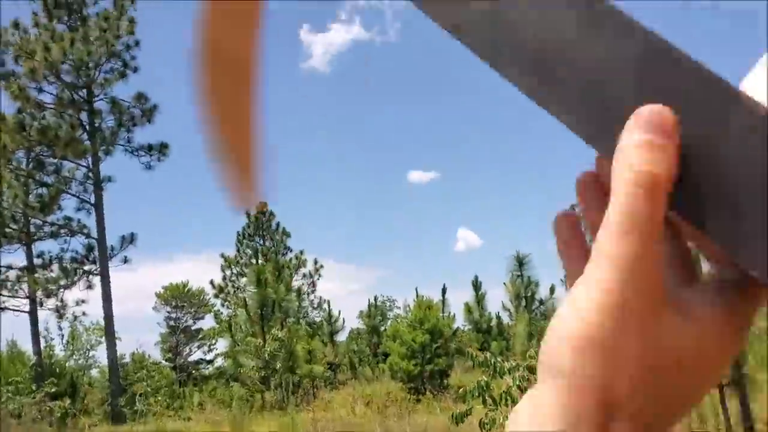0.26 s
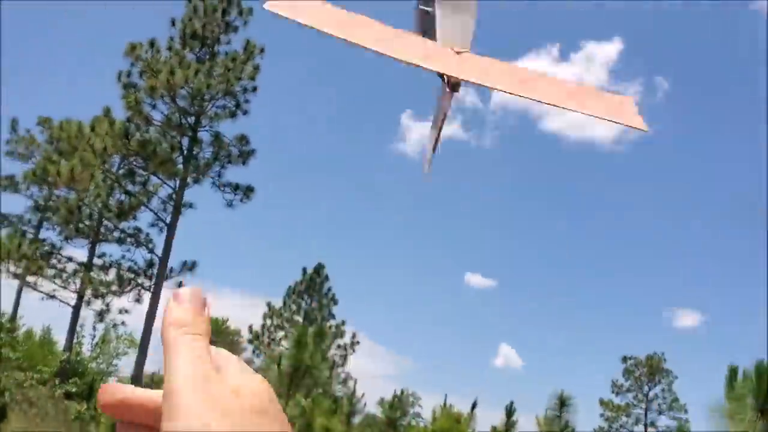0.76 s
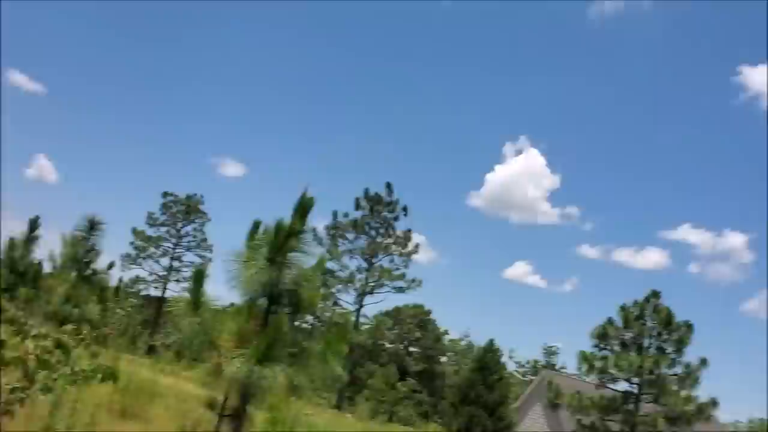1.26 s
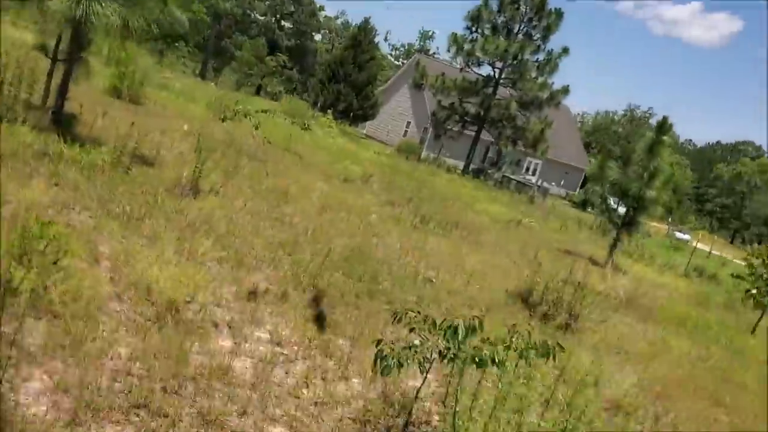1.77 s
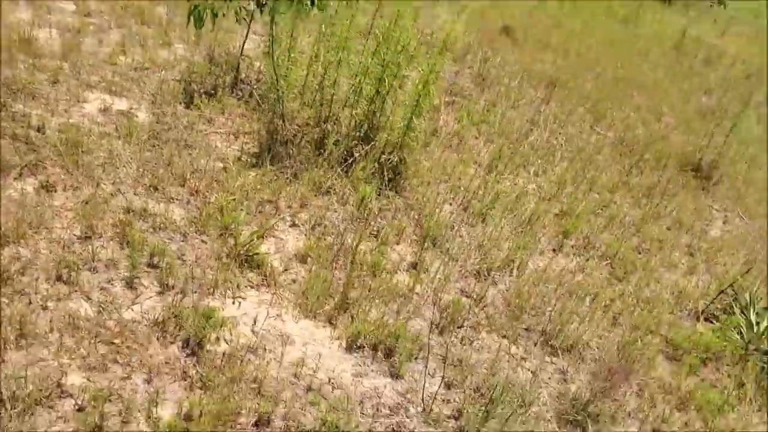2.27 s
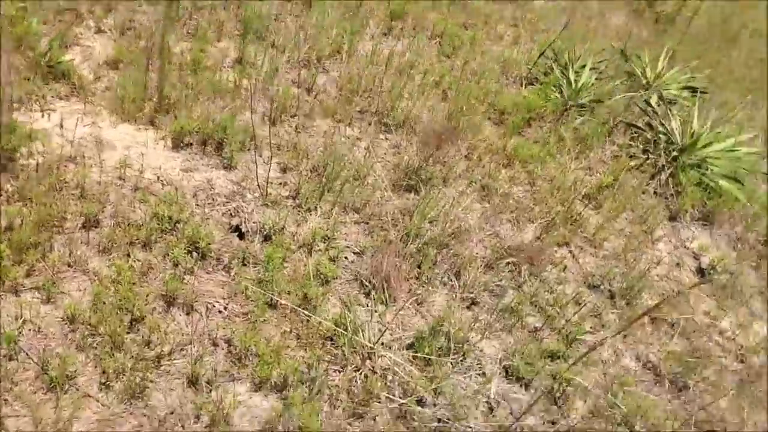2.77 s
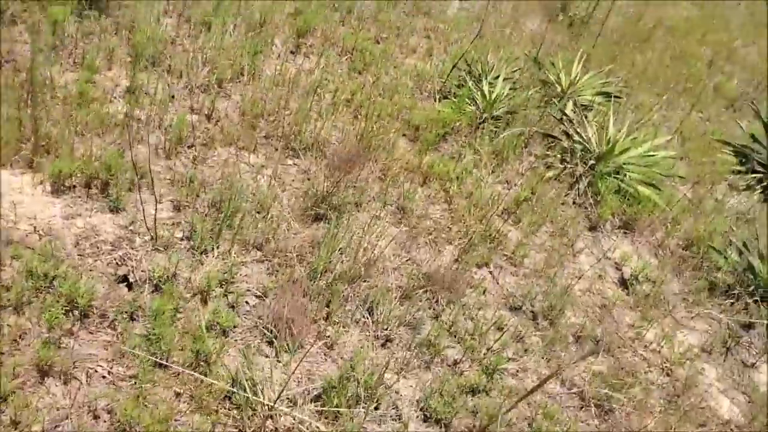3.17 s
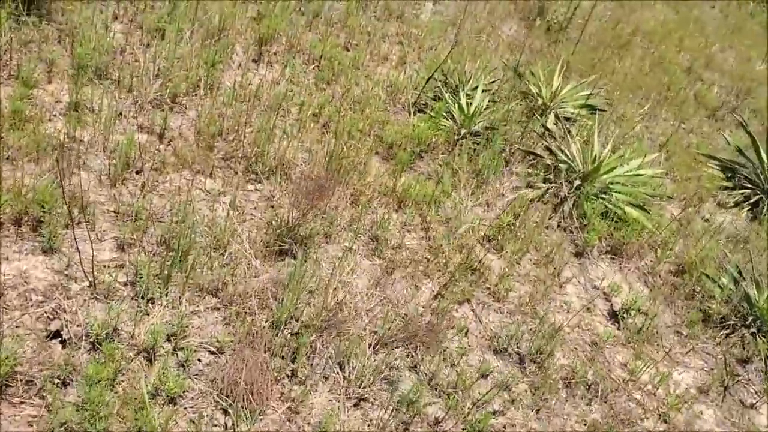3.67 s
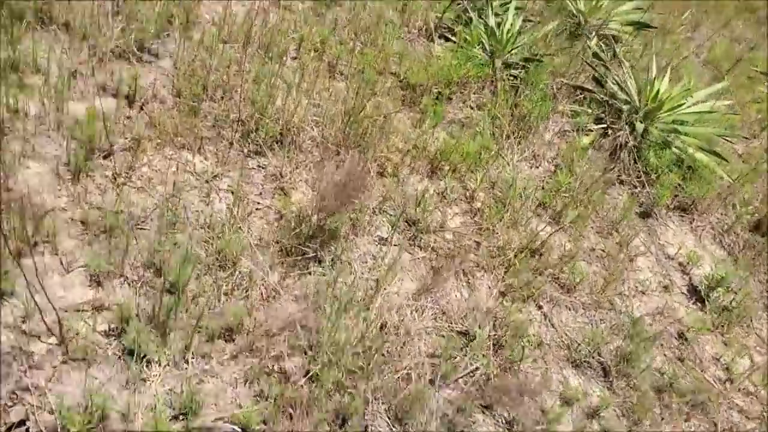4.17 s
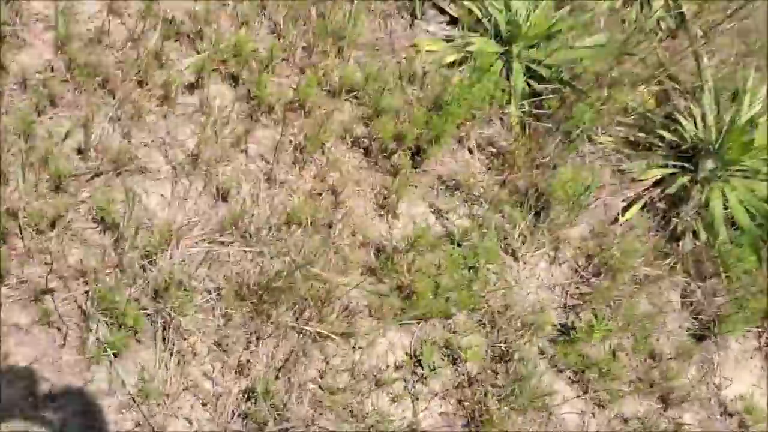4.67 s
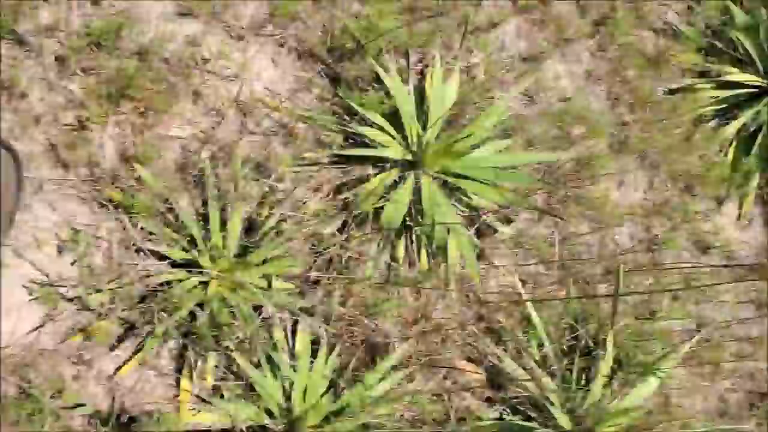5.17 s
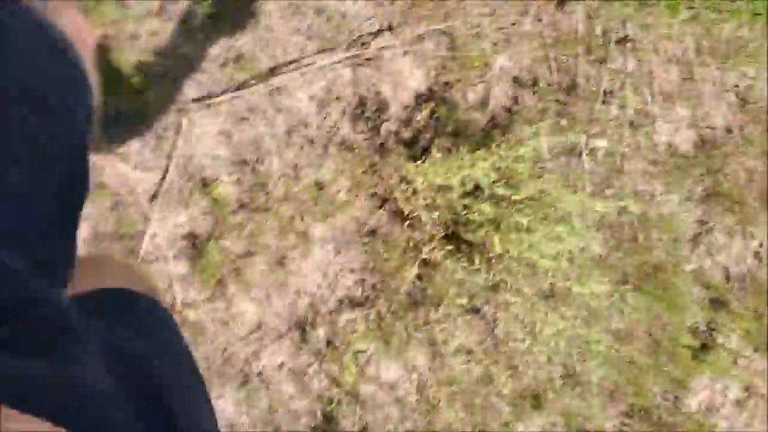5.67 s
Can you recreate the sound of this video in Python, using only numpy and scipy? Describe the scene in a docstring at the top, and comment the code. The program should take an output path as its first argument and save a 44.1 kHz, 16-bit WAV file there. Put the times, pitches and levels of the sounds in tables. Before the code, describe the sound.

Outdoors, quick clicks and an airy whoosh of a launched model plane give way to dry snaps and crunching steps through brittle plants.

```python
"""Steps through dry meadow plants lead: straw crunches as dense random breaks exciting resonant stalks,
blades swish along the legs as finer, higher breaks, and stalks and twigs snap as short bursts with a ring.
Before the walk, someone with a small camera throws a rubber-driven model plane: the hand snaps and clicks on
it, filtered grains rush and fade, and decaying resonances knock once a turn. Low noise buffets two microphone
ports, decaying low notes thud on the ground, and a faint steady outdoor hiss lies beneath."""
import sys
import numpy as np
from scipy import signal
from scipy.fft import rfft, irfft
from scipy.io import wavfile
from scipy.ndimage import uniform_filter1d

SR = 44100
rng = np.random.default_rng(int(sys.argv[2]) if len(sys.argv) > 2 else 0)


def master_out(mix):
    """Clip the mix to full scale and print it as 16-bit PCM to the path in sys.argv[1]."""
    frames = np.transpose(np.atleast_2d(mix))
    ceiling = np.clip(frames, -1, 1)
    pcm = np.round(ceiling * 32767).astype(np.int16)
    wavfile.write(sys.argv[1], SR, pcm)


N = 260542  # samples

# Outdoor hiss, spectral shape: (frequency [Hz], gain [dB])
AIR_SPECTRUM = [(59, -49), (100, 2), (186, -4), (291, -18.5), (486, 4), (778, -3.5), (1610, -3), (3050, -9),
                (6450, -12.5), (7650, -20), (13900, -11.5), (15500, -21), (16500, -40)]
# Turbulence at the ports, spectral shape: (frequency [Hz], gain [dB])
BUFFET_SPECTRUM = [(12, -3.5), (20, -21), (47, 5), (87, 5), (103, 2.5), (135, -14.5), (250, -12.5),
                   (320, -28.5), (550, -120)]
# Puffs of air at the ports as the camera swings: (peak time [s], length [s], level [dB])
AIR_PUFFS = [(0.252, 0.47, -32), (0.54, 0.65, -43.5), (1.326, 0.029, -21), (1.466, 0.28, -41.5),
             (1.789, 0.053, -43), (2.1, .3, -53.5), (2.646, 0.28, -57.5), (3.093, 0.12, -58),
             (3.75, 0.35, -53), (4.546, 0.99, -49), (5.019, .25, -33.5), (5.362, 0.14, -40.5),
             (5.487, 0.092, -40.5), (5.81, 0.43, -30.5)]
# Air rushing over the wing, spectral shape: (frequency [Hz], gain [dB])
RUSH_SPECTRUM = [(71, -15), (120, -5.5), (286, -6), (718, -3.5), (771, -3), (1260, -7.5), (2200, -2.5),
                 (4700, -22.5), (9000, -17), (11700, -86), (19800, -120)]
# Resonances of the model's fuselage: (frequency [Hz], level [dB], 60 dB decay time [s])
FUSELAGE_MODES = [(1184, -2.5, 0.019), (1600, -4, 0.021), (2390, -1.5, 0.011)]
# Dull thuds on the ground: (time [s], level [dB])
GROUND_THUDS = [(1.3138, -7), (1.665, -42), (2.125, -43.5), (4.087, -33), (4.525, -29), (4.89, -29),
                (5.321, -37), (5.481, -29), (5.842, -28)]
# Sharp snaps and clicks, the first three of the hand on the model:
# (time [s], level [dB], ring pitch [Hz], treble re body [dB], left minus right [dB])
SHARP_SNAPS = [(.085, -15.5, 3530, -16, 17), (.091, -15, 3200, -6, 5), (.154, -8.5, 700, -1, -2.5),
               (1.312, -9.5, 840, -20, -7.5), (1.3145, -13, 597, -30, 0), (1.332, -10, 1030, -16, 3.5),
               (1.382, -9, 500, -0.5, 7), (1.39, -17.5, 600, -25, -8), (1.408, -9, 1760, -16, 2),
               (1.453, -10.5, 3440, -14, 6), (1.511, -36, 1670, -28, -3.5), (1.665, -32.5, 756, -21, 6),
               (1.686, -41.5, 1640, -27, -7.5), (1.765, -21, 3340, -18, 7.5),
               (1.991, -9.5, 840, -7.5, -1.5), (2.108, -40, 900, -22, 2.5), (2.127, -35.5, 584, -22, 0),
               (2.389, -14.5, 830, -39, 9.5), (2.414, -30, 756, -37, -9.5), (2.488, -35.5, 1200, -17, -3),
               (2.652, -25, 655, -22, 3), (2.658, -25.5, 930, -24, -12.5), (2.717, -22.5, 1100, -21, 1.5),
               (2.792, -38.5, 553, 11, 2), (2.869, -45, 501, 13, -1), (2.917, -54, 536, 16, -1),
               (3.15, -47, 2090, 6, -1), (3.159, -42, 2130, 14, -7.5), (3.181, -36, 1990, .6, 1.5),
               (3.447, -42, 1570, -4, -5.5), (3.545, -28, 5950, 6, 3), (3.58, -36.5, 2160, 14, 2.5),
               (3.683, -30, 3330, 10, 3.5), (3.709, -25, 5250, -2, 2.5), (3.897, -27, 2360, -5, -0.5),
               (4.023, -33, 2470, -17, -2.5), (4.087, -40, 732, 18, -1.2), (4.123, -24, 1810, -6, -4.5),
               (4.236, -33.5, 610, 7, 1.8), (4.322, -34, 2220, -24, -8), (4.369, -24, 1710, -19, 3.5),
               (4.526, -28.5, 614, 1, 1.5), (4.713, -41.5, 2390, 18.5, 3.5), (4.747, -39, 585, 20, 4.5),
               (4.781, -32, 680, 5, 1), (4.799, -17, 570, 7, 5), (4.972, -17.5, 690, -2.5, 3.5),
               (4.996, -11.5, 1060, -21, 2.5), (5.005, -11, 825, -7.5, 10.5), (5.03, -11, 730, -7, 6),
               (5.069, -19.5, 1630, -14, 6), (5.108, -21, 2080, 4, 3.5), (5.299, -13.5, 2520, -16, 7.5),
               (5.32, -23.5, 2380, 5.5, 4), (5.481, -10, 800, -12, 7.5), (5.629, -13.5, 786, -4, 5),
               (5.704, -36.5, 571, 14, -6), (5.842, -6, 815, -5.5, 1.5), (5.853, -13, 940, -26, 0.6)]
# Single breaks, spectral shape: (frequency [Hz], gain [dB])
CRACK_SPECTRUM = [(150, -14.5), (400, -5), (900, -3.5), (2200, -1.5), (4500, -0.5), (6500, -5), (8500, -25)]
# Crunching straw, spectral shape: (frequency [Hz], gain [dB])
CRUNCH_SPECTRUM = [(71, -37), (120, -9), (291, -15), (445, -8), (510, -9), (1460, -7.5), (2280, -6.5),
                   (4420, -11.5), (7000, -73), (9100, -1), (15400, -120)]
# Blades along the legs, spectral shape: (frequency [Hz], gain [dB])
SWISH_SPECTRUM = [(3000, -6.5), (4200, -16.5), (5300, -5.5), (6600, -0.5), (7600, -11.5), (9500, -13),
                  (12200, 1), (14500, -4), (16000, -4)]
# Resonances of stalks of several sizes: frequency [Hz]
STALK_RINGS_HZ = [180, 300, 500, 800, 1300, 2100, 3400, 5500]
# Short scrapes through straw, the first three of the hand on the model:
# (peak time [s], length [s], crunch level [dB], swish level [dB], crunch brightness [dB])
STRAW_SCRAPES = [(0.076, 0.1, -50, -43, 15.5), (.158, 0.015, -23, -32, -2), (0.43, 0.045, -60, -47.5, 0),
                 (1.396, 0.033, -21.5, -38, -3), (1.779, .06, -55.5, -60, -4),
                 (2.353, 0.049, -50.5, -64, -4), (2.404, 0.045, -49, -69, -4),
                 (2.607, 0.052, -39.5, -38.5, -13), (2.663, 0.044, -40, -50, 3),
                 (2.715, 0.022, -38.5, -43.5, 8), (2.795, 0.025, -64, -44, -4),
                 (2.864, 0.06, -53, -47.5, 6), (2.97, 0.055, -57.5, -56, -13), (3.188, 0.019, -47, -48, 12),
                 (3.415, 0.028, -55, -47, 8), (3.452, 0.019, -49, -44, 8), (3.612, 0.063, -48.5, -45.5, 2),
                 (3.711, 0.015, -62, -36.5, 4), (3.764, 0.049, -50, -54, -16),
                 (3.962, 0.031, -38, -54, -4.5), (4.025, 0.05, -41.5, -65, 2),
                 (4.107, 0.052, -41.5, -41, 1), (4.175, 0.035, -42, -36, 1), (4.236, 0.014, -43, -41, -10),
                 (4.39, 0.047, -39.5, -46, -2), (4.464, 0.06, -42, -43.5, -2),
                 (4.537, 0.023, -40, -45, -12), (4.682, 0.039, -37, -52, -12), (4.801, 0.039, -37, -34, 10),
                 (5.006, 0.084, -36, -49, 2), (5.106, 0.037, -41.5, -36, 15),
                 (5.164, 0.016, -65, -34.5, -5), (5.211, 0.051, -40.5, -45.5, -1.5),
                 (5.346, 0.035, -41.5, -42, -6), (5.382, 0.02, -38.5, -59, -15),
                 (5.428, 0.015, -55, -36, 0), (5.526, 0.051, -36.5, -39, -11),
                 (5.62, 0.067, -40.5, -38.5, 10), (5.738, 0.076, -38.5, -46, -11),
                 (5.848, 0.018, -35, -29, 4)]
# Feet and legs moving through the plants: (start [s], length [s], crunch level [dB], swish level [dB],
# crunch brightness [dB], level change from start to end [dB])
PLANT_STEPS = [(1.321, 0.1, -42.5, -82, -13.5, -8), (1.46, 0.94, -62.5, -96, -11.5, -8),
               (2.549, 0.32, -51, -51, -7.5, -6.5), (3.03, 0.16, -48.5, -49.5, -6, 1),
               (3.592, 0.2, -51.5, -51, -2.5, 6), (3.841, 0.17, -48, -52, -1, 1.5),
               (4.063, .27, -50.5, -61.5, -6, 5.5), (4.363, 0.22, -42, -55, -5, 7),
               (4.64, 0.273, -43.5, -49.5, 0.5, 3), (4.968, .27, -43.5, -56, -1, -10),
               (5.294, 0.14, -39, -51, -6.5, 0.5), (5.474, 0.16, -39, -52, -3.5, 1),
               (5.707, 0.18, -42, -49, 2, -3)]
# Difference between the two ports: (frequency [Hz], left minus right [dB])
PORT_DIFFERENCE = [(60, 3), (300, -5.5), (2000, -5.5), (15000, -10.5)]

AIR_DB, TOP_HZ = -61.5, 16000
PUFF_RISE_SHARE, CALM_DB = 0.31, -65  # share of the length spent rising; buffeting between puffs
# The rush begins bright, then fades and darkens as the model flies off.
RUSH_DB, RUSH_ATTACK_S, RUSH_LEAVES_S, RUSH_FADE_DB_PER_S = -35.5, .17, 0.47, 27
RUSH_BRIGHT_DB, RUSH_BRIGHT_S, RUSH_DARKENS_DB_PER_S = 27, 0.1, 7
SLEEVE_DB = -23.5  # swish during the throw, relative to the rush
# The rubber motor knocks once a propeller turn; KNOCK_AT_S fixes the phase of the turns.
TURN_S, KNOCK_AT_S, TURN_JITTER_S, KNOCK_ENDS_S = .0559, 1.512, .004, 2.3
KNOCK_DB, KNOCK_FADE_DB_PER_S, KNOCK_SCATTER_DB, FLUTTER_DB = -33.5, 5, 3, 1.5
KNOCK_SOFT_S = 0.0013  # contact time constant
THUD_HZ, THUD_T60_S = 132, 0.024  # final pitch
# Noise rising into the crack and rustle after it, relative to the crack
SNAP_ONSET_DB, SNAP_RUSTLE_DB, RUSTLE_T60_S = -22, -28, 0.042
LAG_MS_PER_DB, CENTRE_PAN_DB, LAG_SCATTER_MS = 0.14, 3, .12  # the louder port is the nearer one
CRACK_TOP_RATIO = 2.84  # top of the crack over the ring pitch: thick stalks crack dull
RING_SHARE, RING_CYCLES = 0.52, 2.5
STEP_ATTACK_S, STEP_RELEASE_DB_PER_S = 0.016, 325
STILL_SWISH_DB = -67.5  # grass stirring between steps
SCRAPE_RISE_SHARE = 0.43
PLANTS_PAN_DB, THROW_PAN_DB = 4, 2.5  # left minus right


def undb(db):
    """Decibel definition: amplitude ratio from level."""
    return 10 ** (np.asarray(db) / 20)


def unit(x):
    """Normalisation to unit root-mean-square amplitude."""
    return x / np.sqrt(np.mean(x ** 2))


def colour(x, points, size=4096):
    """Minimum-phase filtering: gain follows (Hz, dB) points through a folded cepstrum."""
    hz, db = np.transpose(points)
    bins = np.fft.rfftfreq(size, 1 / SR)
    log_gain = np.interp(np.log(bins + 1), np.log(hz), db) * np.log(10) / 20
    cepstrum = irfft(log_gain)
    # Folding negative time onto positive time makes the filter causal.
    cepstrum[1:size // 2] *= 2
    cepstrum[size // 2 + 1:] = 0
    taps = irfft(np.exp(rfft(cepstrum)))
    return signal.fftconvolve(x, taps[None], axes=1)[:, :x.shape[1]]


def tilt(x, dull_gain, bright_gain):
    """Complementary band splitting: separate gains below and above about a kilohertz."""
    dull = signal.sosfiltfilt(signal.butter(1, 1050, fs=SR, output="sos"), x)
    return dull_gain * dull + bright_gain * (x - dull)


def walk(rate):
    """Slow random modulation: levels held 1 / rate s, then slewed, with spread near 1."""
    hold = int(SR / rate)
    held = np.repeat(rng.standard_normal(N // hold + 1), hold)
    return 1.06 * uniform_filter1d(held, hold)[:N]


def swells(s, length, rise_share):
    """Gaussian power envelopes, one row each, quicker up than down."""
    t = np.arange(N) / SR - np.asarray(s)[:, None]
    share = np.where(t < 0, rise_share, 1 - rise_share)
    return np.exp(-2 * (t / (length[:, None] * share)) ** 2)


def grains(rate, scatter_db, lag_ms, count=60000):
    """Random impulse process: tiny breaks, each reaching the two ports with its own lag."""
    when, size, side, sign = rng.random((count, 4)).T
    active = np.arange(count) < rate * N / SR
    gain = undb(-scatter_db * np.log(1 - .995 * size)) * np.sign(sign - .5) * active
    at = when * (N - 100) + 50
    lag = (side - .5) * lag_ms * SR / 1000
    return np.array([np.bincount((at + way * lag).astype(int), gain, N) for way in (.5, -.5)])


def rustle(points, rings_hz, rate, scatter_db, lag_ms, smear_db, flicker_db, flicker_rate, lump_db):
    """Resonant excitation: smeared breaks ring stalks of several sizes, bunched together and by size."""
    t = np.arange(600) / SR
    flicker = flicker_db * walk(flicker_rate)
    stalks = 0
    for hz in rings_hz:
        tail = undb(smear_db) * rng.standard_normal((2, len(t))) * np.exp(-t / 0.0014)
        tail[:, 0] = 1
        broken = signal.fftconvolve(grains(rate, scatter_db, lag_ms), tail, axes=1)[:, :N]
        bunched = broken * undb(flicker + lump_db * walk(0.65 * flicker_rate))
        ring = signal.lfilter(*signal.iirpeak(hz, 2.3, SR), bunched)
        stalks = stalks + unit(ring)
    return unit(colour(stalks, points))


def air():
    """Partly correlated stationary noise: distant leaves and microphone hiss."""
    both, left, right = rng.standard_normal((3, N))
    noise = np.array([left + 0.51 * both, right + 0.7 * both])
    return undb(AIR_DB) * unit(colour(noise, AIR_SPECTRUM))


def buffeting():
    """Turbulent pressure at the ports: low noise in lumps, partly shared."""
    both, left, right = rng.standard_normal((3, N))
    noise = np.array([left + .5 * both, right + .5 * both])
    return unit(colour(noise * undb(4.7 * walk(30)), BUFFET_SPECTRUM))


def puffs():
    """Power addition: swelling puffs over calm air set the buffeting gain."""
    s, length, db = np.transpose(AIR_PUFFS)
    return np.sqrt(undb(CALM_DB) ** 2 + undb(db) ** 2 @ swells(s, length, PUFF_RISE_SHARE))


def thuds():
    """Damped oscillation: a low note drops in pitch and dies quickly, alike at both ports."""
    t = np.arange(SR // 10) / SR
    bent_time = t + 0.0042 * (1 - np.exp(-t / 0.0025))
    thud = np.sin(2 * np.pi * THUD_HZ * bent_time) * undb(-60 * t / THUD_T60_S)
    s, db = np.transpose(GROUND_THUDS)
    blows = np.bincount(((s + 0.00148) * SR).astype(int), undb(db), N)
    return np.convolve(blows, thud)[:N]


def motor():
    """Impulsive excitation of damped fuselage modes: a hollow knock each turn, never quite on time."""
    turns = np.arange(-22, int((KNOCK_ENDS_S - KNOCK_AT_S) / TURN_S) + 1)
    late, size = rng.standard_normal((len(turns), 2)).T
    s = KNOCK_AT_S + TURN_S * turns + TURN_JITTER_S * late
    level_db = KNOCK_DB - KNOCK_FADE_DB_PER_S * s + KNOCK_SCATTER_DB * size
    blows = np.bincount((s * SR).astype(int), undb(level_db), N)
    t = np.arange(SR // 20) / SR
    ring = sum(undb(db - 60 * t / t60) * np.sin(2 * np.pi * hz * t) for hz, db, t60 in FUSELAGE_MODES)
    return np.convolve(blows, ring * (1 - np.exp(-t / KNOCK_SOFT_S)))[:N]


def flight():
    """Fading and darkening with departure: level and brightness of the rush [dB]."""
    t = np.arange(N) / SR
    gone = np.maximum(t - RUSH_LEAVES_S, 0)
    rush_db = RUSH_DB - 30 * np.exp(-2 * t / RUSH_ATTACK_S) - RUSH_FADE_DB_PER_S * gone
    # The propeller chops the stream once a turn.
    rush_db += FLUTTER_DB * np.cos(2 * np.pi * (t - KNOCK_AT_S) / TURN_S)
    bright_db = RUSH_BRIGHT_DB * np.exp(-t / RUSH_BRIGHT_S) - RUSH_DARKENS_DB_PER_S * gone
    return rush_db, bright_db


def throw(swish, crackle):
    """Turbulent flow as dense grains: air rushes over the wing, with sleeve swish and crackle."""
    rush_db, bright_db = flight()
    rush = rustle(RUSH_SPECTRUM, STALK_RINGS_HZ, rate=1500, scatter_db=2.8, lag_ms=1.1, smear_db=-12,
                  flicker_db=2.2, flicker_rate=45, lump_db=3.2)
    stream = rush + undb(-19) * crackle
    stream = tilt(stream, undb(rush_db - bright_db / 2), undb(rush_db + bright_db / 2))
    return stream + undb(rush_db + SLEEVE_DB) * swish


def snaps():
    """Impulsive fracture with a damped resonance: each snap cracks and rings, with a treble tick."""
    lead = int(.03 * SR)
    t = (np.arange(4 * lead) - lead) / SR - .0013
    after = np.maximum(t, 0)
    out = np.zeros((2, N + len(t) + lead))
    treble = signal.butter(3, 8500, "high", fs=SR, output="sos")
    crack = np.exp(np.where(t < 0, t / .0003, -t / .0009))
    onset_db = SNAP_ONSET_DB + 300 * t / RUSTLE_T60_S
    rustle_db = SNAP_RUSTLE_DB - 60 * t / RUSTLE_T60_S
    shape = crack + undb(np.where(t < 0, onset_db, rustle_db))
    for s, db, hz, treble_db, pan_db in SHARP_SNAPS:
        both, own = rng.standard_normal(len(t)), rng.standard_normal((2, len(t)))
        lag_ms = LAG_MS_PER_DB * (CENTRE_PAN_DB - pan_db) + LAG_SCATTER_MS * rng.standard_normal()
        burst = (both + .6 * own) * shape
        mid = colour(burst, CRACK_SPECTRUM + [(TOP_HZ, -60)], size=512)
        mid_top = signal.butter(2, min(CRACK_TOP_RATIO * hz, SR / 3), fs=SR, output="sos")
        mid = signal.sosfilt(mid_top, mid)
        # The ring dies within a few cycles, whatever its pitch.
        ring = RING_SHARE * np.sin(2 * np.pi * hz * after) * np.exp(-after * hz / RING_CYCLES)
        body = mid / abs(mid).max() + ring
        high = signal.sosfilt(treble, burst)
        sound = body / abs(body).max() + undb(treble_db) * high / abs(high).max()
        for ear, way in enumerate((.5, -.5)):
            # The nearer port tends to hear the crack a little earlier.
            i = int((s + way * lag_ms / 1000) * SR)
            out[ear, i:i + len(t)] += undb(db + way * pan_db) * sound[ear]
    return out[:, lead:N + lead]


def scrapes():
    """Power addition of steps and scrapes: gains of the dull crunch, bright crunch and swish."""
    t = np.arange(N) / SR
    power = np.zeros((3, N))
    power[-1] = undb(STILL_SWISH_DB) ** 2
    for s, length, crunch_db, swish_db, bright_db, change_db in PLANT_STEPS:
        drift_db = change_db * (np.clip((t - s) / length, 0, 1) - .5)
        release_db = STEP_RELEASE_DB_PER_S * np.maximum(t - s - length, 0)
        attack = np.clip((t - s) / STEP_ATTACK_S + 1, 0, 1)  # complete at the start time
        levels = undb([[crunch_db - bright_db / 2], [crunch_db + bright_db / 2], [swish_db]])
        power += (levels * undb(drift_db - release_db) * attack) ** 2
    s, length, crunch_db, swish_db, bright_db = np.transpose(STRAW_SCRAPES)
    powers = undb([crunch_db - bright_db / 2, crunch_db + bright_db / 2, swish_db]) ** 2
    return np.sqrt(power + powers @ swells(s, length, SCRAPE_RISE_SHARE))


def plants(swish, crackle):
    """Friction and fracture: the step and scrape gains shape the crunch, swish and dry crackle."""
    dull_gain, bright_gain, swish_gain = scrapes()
    crunch = rustle(CRUNCH_SPECTRUM, STALK_RINGS_HZ, rate=550, scatter_db=3.5, lag_ms=1.01, smear_db=-20.5,
                    flicker_db=1.5, flicker_rate=76, lump_db=4.5)
    crunching = tilt(crunch, dull_gain, bright_gain)
    return crunching + swish_gain * swish + bright_gain * undb(-11.0) * crackle


def scene():
    """Linear superposition of all sources at the two ports."""
    swish = rustle(SWISH_SPECTRUM, [3860, 5800, 8100, 11900, 15000, 16800], rate=3900, scatter_db=6.0,
                   lag_ms=1.0, smear_db=-17.5, flicker_db=2.5, flicker_rate=110, lump_db=3.5)
    # Single dry breaks sound in all bands at once.
    breaks = grains(rate=200, scatter_db=3.5, lag_ms=0.76)
    crackle = unit(colour(breaks, CRACK_SPECTRUM + [(TOP_HZ, -24)]))
    sides = np.array([[.5], [-.5]])
    background = air() + puffs() * buffeting() + thuds() + motor()
    thrown = throw(swish, crackle) * undb(sides * THROW_PAN_DB)
    walked = plants(swish, crackle) * undb(sides * PLANTS_PAN_DB)
    return background + thrown + snaps() + walked


def record(dry):
    """Port response, soft saturation of the loudest peaks and a steep low-pass cut."""
    ports = []
    for ear, way in enumerate((.5, -.5)):
        response = [(hz, way * db) for hz, db in PORT_DIFFERENCE]
        ports.append(colour(dry[[ear]], response, size=512)[0])
    rounded = 1.2 * np.tanh(np.array(ports) / 1.2)
    return signal.sosfilt(signal.ellip(8, .3, 60, TOP_HZ, fs=SR, output="sos"), rounded)


dry = scene()
out = record(dry)
master_out(out)
```